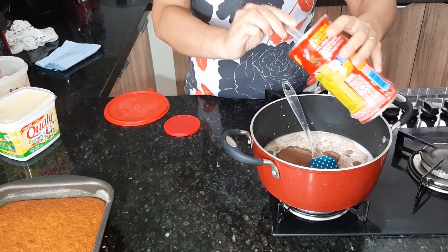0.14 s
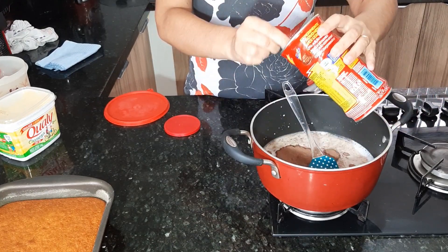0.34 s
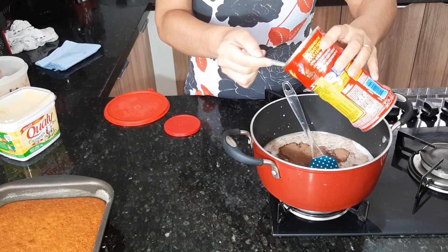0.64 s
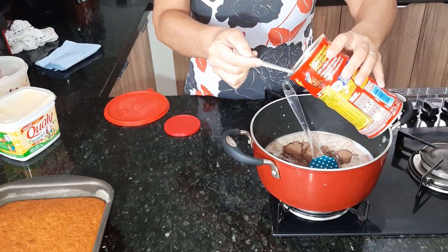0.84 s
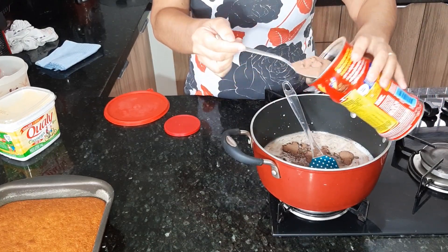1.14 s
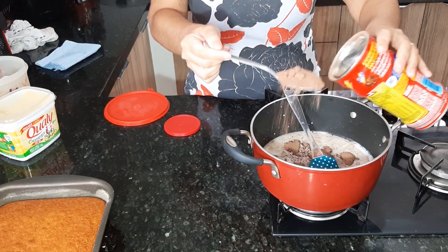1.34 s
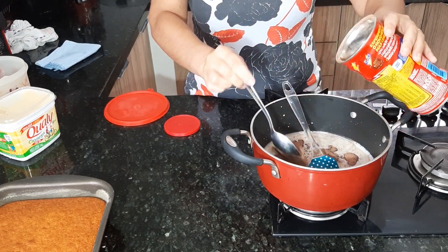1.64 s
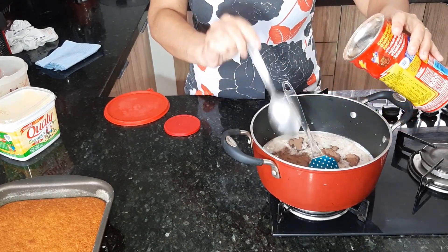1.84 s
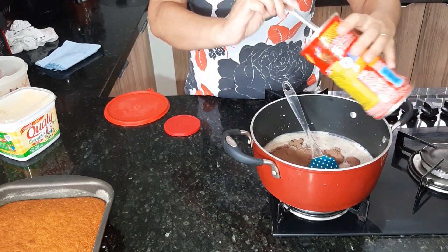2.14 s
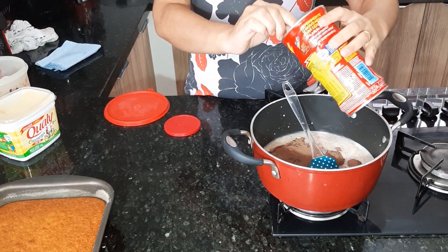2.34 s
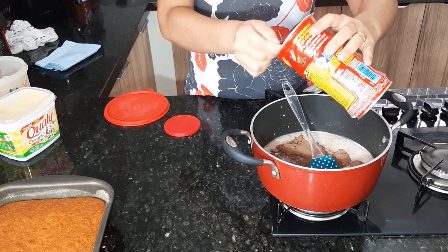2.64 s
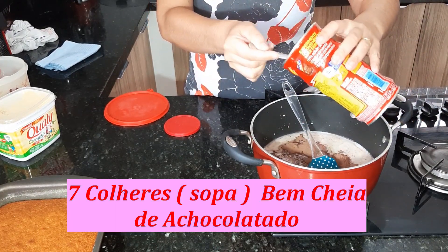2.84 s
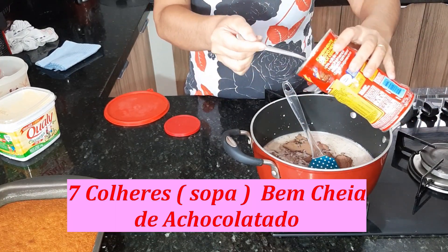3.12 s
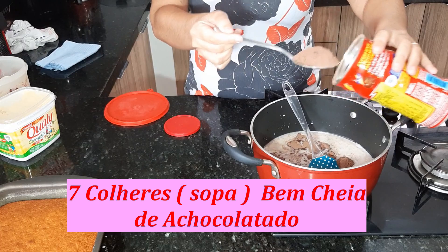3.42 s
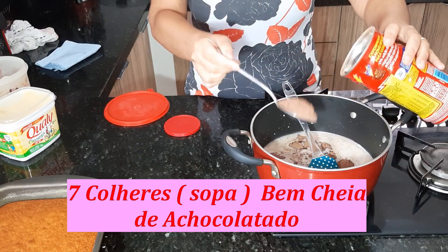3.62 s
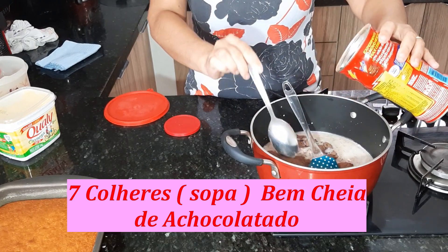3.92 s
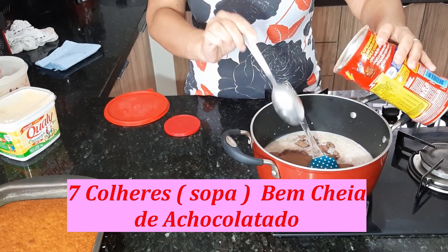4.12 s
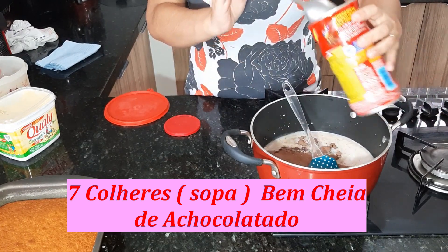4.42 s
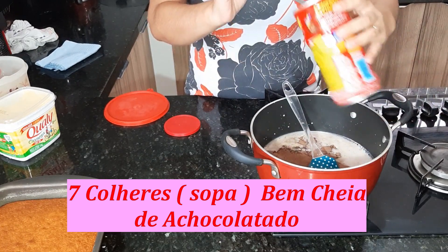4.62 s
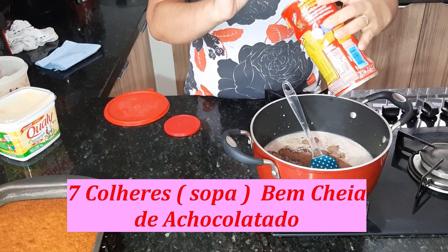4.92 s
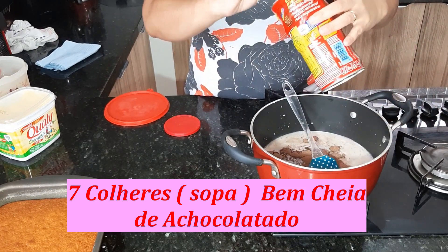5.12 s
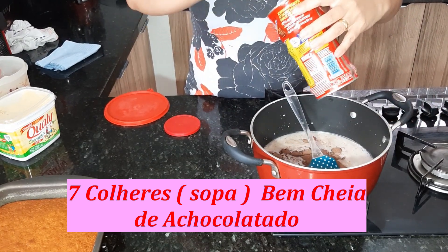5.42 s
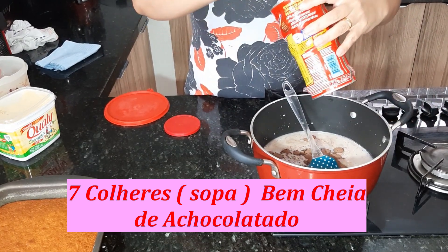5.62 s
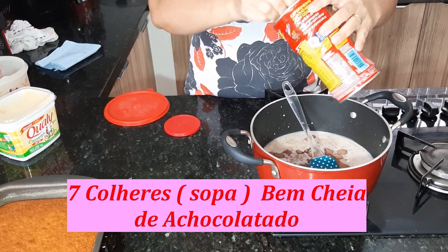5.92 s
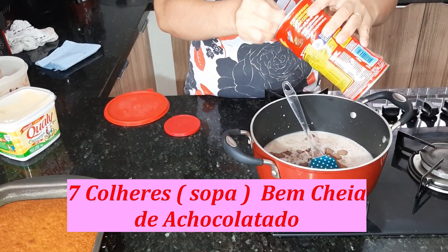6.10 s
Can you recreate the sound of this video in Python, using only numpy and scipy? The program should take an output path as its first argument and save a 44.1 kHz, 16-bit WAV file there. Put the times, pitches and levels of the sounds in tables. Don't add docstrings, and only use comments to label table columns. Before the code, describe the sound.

A metal spoon rasps powder out of a nearly empty tin with hollow bumps and ringing knocks, in an echoing tiled kitchen with a low fridge hum.

```python
import sys
import numpy as np
from scipy import signal
from scipy.fft import rfft, irfft
from scipy.io import wavfile
from scipy.ndimage import uniform_filter1d

SR = 44100
rng = np.random.default_rng(int(sys.argv[2]) if len(sys.argv) > 2 else 0)


def generate_wav(signal):
    frames = np.transpose(np.atleast_2d(signal))
    scaled = np.clip(frames, -1, 1) * 32767
    pcm = np.round(scaled).astype(np.int16)
    wavfile.write(sys.argv[1], SR, pcm)


def attenuation_scalar(level_db):
    decades = np.asarray(level_db, float) / 20
    return 10 ** decades


N = 276058
T = np.arange(N) / SR
HZ = np.fft.rfftfreq(N, 1 / SR) + 1e-3

# freq_hz, width_hz, level_db
WALL_MODES = [(840, 230, -12.5), (1910, 320, -7.5), (2970, 530, -2), (3510, 600, 0.5), (4690, 500, -3),
              (5880, 650, -3), (6590, 350, 0), (6970, 180, -22)]


def on_log(table, hz=HZ):
    point_hz, value = np.transpose(table)
    return np.interp(np.log(hz), np.log(point_hz), value)


def shape(x, gain):
    return irfft(rfft(x, N) * gain, N)


def modes(table):
    return sum(attenuation_scalar(db) * 1j * HZ * width / (f * f - HZ * HZ + 1j * HZ * width) for f, width, db in table)


def unit(x):
    return x / np.sqrt(np.mean(x ** 2))


def peak1(spectrum):
    x = irfft(spectrum, N)
    return x / np.abs(x).max()


def walk(rate_hz):
    k = int(SR / rate_hz)
    once = uniform_filter1d(rng.standard_normal(N), k)
    return unit(uniform_filter1d(once, k))


def ports(make):
    # freq_hz, side_over_mid_db
    apart = [(100, -12), (300, -12), (600, -5), (1200, -1), (8000, 0), (14000, -1)]
    mid = make()
    side = shape(make(), attenuation_scalar(on_log(apart)))
    return np.array([mid + side, mid - side])


def grains(per_s, spread_db):
    chance, sign, size = rng.random((3, N))
    return (chance < per_s / SR) * np.sign(sign - 0.5) * attenuation_scalar(-spread_db * np.log(size))


def rasp():
    # time_s, grit_db (3-8 kHz), finest_grains_over_grit_db, wall_rumble_over_grit_db
    strokes = [
        [(0.135, -47, -26, 8), (0.173, -57, -7, -5), (0.277, -50, -3, 3), (0.323, -69, -12, 11),
         (0.389, -49, 5.5, -4), (0.409, -58, -6, 6), (0.439, -53, -1, 4.5), (0.559, -49, 1.5, 2),
         (0.651, -54.5, -1, 2), (0.74, -69, -3, -2)],
        [(1.26, -43, -7, 20), (1.274, -54, 2, 3), (1.338, -62, -6, 5), (1.346, -54.5, -6, 13),
         (1.42, -81, -19, 7)],
        [(2.3, -60, 3, 7), (2.332, -51, -3, -8), (2.39, -62, -7, -5), (2.466, -58.5, -4, 9.5),
         (2.602, -52, -5.5, 2), (2.654, -60, -1, -3), (2.694, -47, -11, 9), (2.708, -44.5, -12, 2),
         (2.77, -56, -5, -2), (2.854, -55, 6.5, -11), (2.95, -77, -5, 4)],
        [(5.115, -53, -11, 6), (5.167, -62, -4, -6), (5.241, -59, 3, -8), (5.25, -50, -6, 9)],
        [(5.33, -57, -16, 16), (5.378, -47, -14, 2), (5.396, -50, -11, -6), (5.478, -71, 2, 1),
         (5.522, -59, -6, 0), (5.676, -60, -7, 5), (5.786, -58, -3, 3.5), (5.926, -43.5, 1, 6.5),
         (5.94, -62, 4, 13), (5.95, -49, 6, 12), (5.998, -56, 0, 2), (6.034, -51.5, -7.5, 5),
         (6.088, -47, 3, 3.5), (6.26, -61, -19, 0)],
    ]
    # freq_hz, width_hz, level_db
    hollow_modes = [(244, 140, -5.5), (478, 80, 0.5), (574, 130, -2.5), (874, 215, -1.5),
                    (1150, 330, -12.5)]
    grit_db, fine_db, rumble_db = np.full((3, N), -120.)
    for rows in strokes:
        s, grit, fine, rumble = np.transpose(rows)
        on = (T >= s[0]) & (T <= s[-1])
        grit_db[on] = np.interp(T[on], s, grit)
        fine_db[on] = np.interp(T[on], s, grit + fine)
        rumble_db[on] = np.interp(T[on], s, grit + rumble)
    slip_db = 3.24 * walk(48) - 3.5
    sway_db = 2.73 * walk(23) - 5.5
    wall_response = modes(WALL_MODES) + 0.74 * modes([(4250, 4200, 0)])
    fizz_response = modes([(11700, 3400, 1.5), (13660, 2200, 1.5)]) ** 2
    wall = unit(shape(grains(6000, 2.4), wall_response))
    fizz = unit(shape(grains(9000, 3.4), fizz_response))
    shake = unit(shape(grains(500, 3.56), modes(hollow_modes)))
    crush = attenuation_scalar(grit_db) * wall + attenuation_scalar(fine_db) * fizz
    return attenuation_scalar(slip_db) * crush + attenuation_scalar(rumble_db + sway_db) * shake


def bumps():
    # time_s, hollow_db, tick_over_hollow_db, hollow_pitch_hz
    bump_events = [(0.129, -34.5, -7.5, 590), (0.299, -37, -25, 470), (0.399, -32.5, -12, 467),
                   (0.499, -41, -1, 444), (0.526, -38, 0, 380), (0.563, -42, -10, 455),
                   (0.623, -41.5, 7.5, 479), (1.036, -62.5, 0.5, 444), (1.195, -27, -11.5, 486),
                   (1.271, -39.5, -3, 380), (1.344, -49, -5, 484), (2.298, -42.5, -9.5, 471),
                   (2.367, -45, 8, 493), (2.427, -45, -20, 1100), (2.544, -39, -2.5, 475),
                   (2.573, -39.5, 1, 472), (2.689, -45, 6, 1006), (2.723, -47, -10, 436),
                   (2.802, -51, 8, 466), (4.489, -41, 7, 383), (4.511, -37.5, -19, 492),
                   (5.112, -55.5, 1, 756), (5.452, -52, 3, 484), (5.899, -47, 4, 473),
                   (5.923, -42, -2, 456), (5.948, -43, -1, 438), (6.015, -30, -10, 478),
                   (6.057, -32.5, 0.5, 694), (6.088, -33.5, -6, 900)]
    k = int(0.1 * SR)
    t, out = T[:k], np.zeros(N + k)
    tick = peak1(modes(WALL_MODES) + modes([(12100, 4900, -3)]))[:k]
    contacts = rng.standard_normal((len(bump_events), 200))
    contacts *= np.exp(-T[:200] / 0.0015)
    for (s, db, tick_db, hz), contact in zip(bump_events, contacts):
        boom = np.sin(2 * np.pi * hz * t) * np.exp(-t / 0.0081)
        boom += 0.56 * np.sin(2 * np.pi * 1.813 * hz * t) * np.exp(-t / 0.0032)
        chatter = np.convolve(tick, contact)[:k]
        i = int(s * SR)
        out[i:i + k] += attenuation_scalar(db) * boom + attenuation_scalar(db + tick_db) * chatter
    return out[:N]


def blow(s, contact_ms):
    return np.exp(-2j * np.pi * HZ * s) / (1 + 1j * HZ * contact_ms / 1000)


def knocks():
    # time_s, blow_db, contact_ms
    knock_events = [
        (1.134, -27.5, -0.25),
        (4.435, -28.5, -1.3),
        (5.252, -32, 0.21),
    ]
    # freq_hz, width_hz, level_db
    rings = [
        [(222, 37, -10), (484, 56, -2), (885, 20, -14), (1113, 55, -20), (2110, 160, -21.5), (2910, 39, -17.5),
         (3410, 56, -27), (5470, 45, -16.5), (6120, 34, -18), (8690, 72, -30), (11600, 160, -26),
         (14500, 58, -42)],
        [(484, 46, -4), (1810, 78, -12.5), (2630, 85, -15.5), (3426, 134, -11), (4030, 190, -15.5),
         (4360, 67, -20), (5180, 210, -20), (6010, 84, -11), (6670, 88, -6.5), (7440, 160, -9), (8300, 33, -8),
         (8710, 23, -28), (9100, 32, -25), (9200, 77, -13), (9780, 160, -13), (10900, 120, -11),
         (11100, 40, -17), (12300, 350, -9), (13700, 340, -7), (15000, 180, -6)],
        [(484, 104, 1), (898, 52, 0), (1432, 55, -2.5), (1646, 43, -3.5), (2034, 45, 1.5), (3345, 35, 4),
         (5250, 43, -22), (6160, 130, -21), (7300, 87, -23), (8700, 110, -32), (9300, 32, -24),
         (12300, 33, -39), (13700, 45, -29), (14200, 45, -33)],
    ]
    out = np.zeros(N)
    for (s, db, contact_ms), ring in zip(knock_events, rings):
        out += attenuation_scalar(db + 13.5) * peak1(blow(s, contact_ms) * modes(ring))
    return out


def room(x):
    # freq_hz, t60_s
    room_t60 = [(150, 0.82), (500, 0.55), (2000, 0.63), (6000, 0.59), (14000, 0.49)]
    lag_samples = 6

    def tail():
        noise = rng.standard_normal(N)
        total = np.zeros(N)
        for centre_hz in 100 * 2. ** np.arange(8):
            octave = np.clip(1 - np.abs(np.log2(HZ / centre_hz)), 0, 1)
            total += shape(noise, octave) * attenuation_scalar(-60 * T / on_log(room_t60, centre_hz))
        build = 1 - np.exp(-(T / 0.005) ** 2)
        early = 1 + 1.24 * np.exp(-T / 0.031)
        return total * build * early

    wet = shape(ports(tail), rfft(x)) * attenuation_scalar(-34.5)
    direct = np.array([np.roll(x, lag_samples), x])
    return wet + attenuation_scalar(-3.5) * direct


def fridge():
    # freq_hz, level_db
    hum_lines = [(296.1, -62), (888.2, -81), (985.1, -80.5), (1184, -92), (1798, -82)]
    # freq_hz, density_db_per_hz
    air_spectrum = [(18, -47), (30, -41.5), (59, -19.5), (109, -22.5), (134, -11), (266, -12), (295, -4.5),
                    (319, -14.5), (426, -18), (988, -24.5), (1540, -30), (1860, -30.5), (3140, -45),
                    (9460, -51), (16000, -45)]
    hum = 0
    for hz, db in hum_lines:
        phase = 6 * rng.random((2, 1)) * min(hz / 3000, 1)
        level = np.sqrt(2) * attenuation_scalar(db + 1.23 * walk(1.8))
        hum = hum + level * np.sin(2 * np.pi * hz * T + phase)
    air = ports(lambda: shape(rng.standard_normal(N), attenuation_scalar(on_log(air_spectrum))))
    rumble = shape(rng.standard_normal(N), modes([(69.4, 29, 0)]) ** 2)
    return hum + attenuation_scalar(-61.5) * unit(air) + attenuation_scalar(-75 + 3.5 * walk(2.5)) * unit(rumble)


def scene():
    return room(rasp() + bumps() + knocks()) + fridge()


def band_limit(x):
    return signal.sosfilt(signal.butter(12, 17100, fs=SR, output="sos"), x)


def record(dry):
    return band_limit(dry)


dry = scene()
out = record(dry)
generate_wav(out)
```